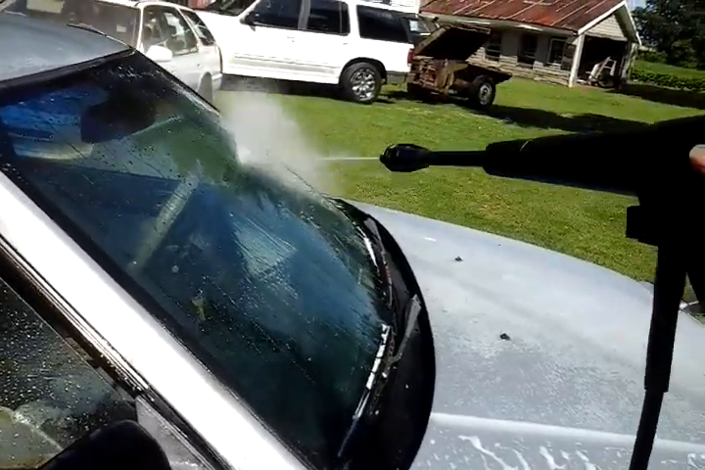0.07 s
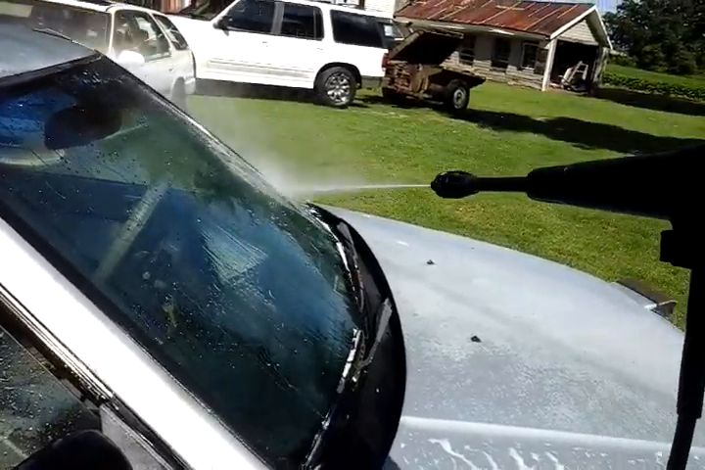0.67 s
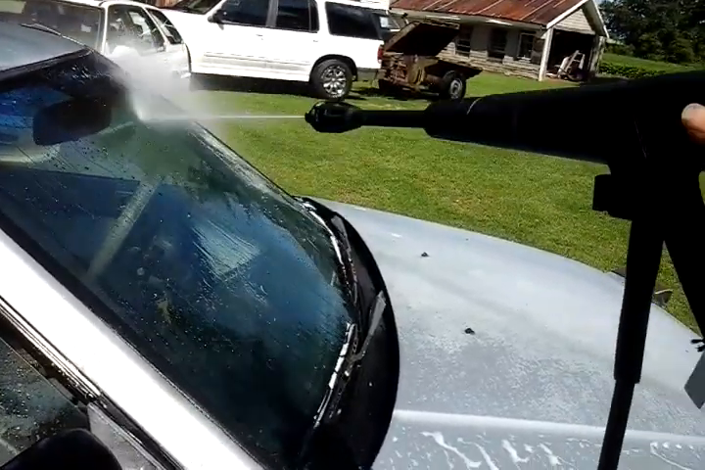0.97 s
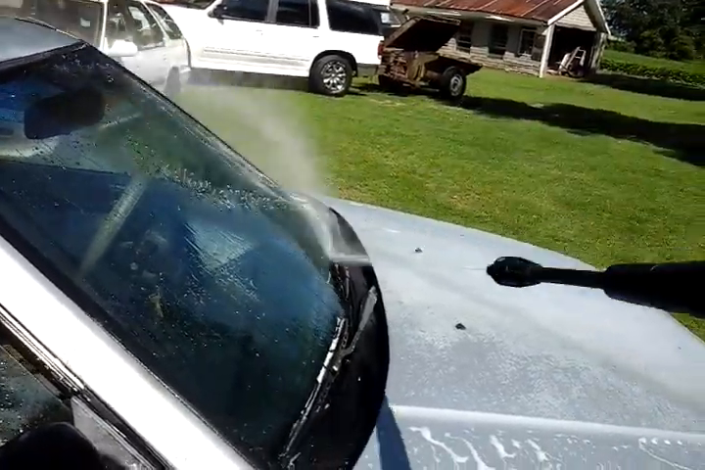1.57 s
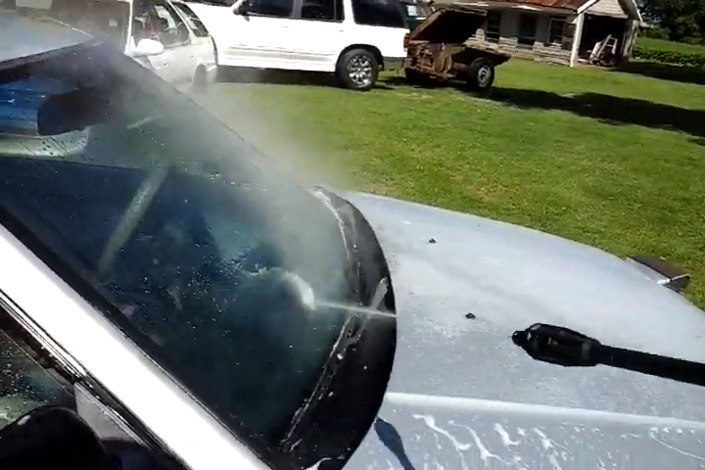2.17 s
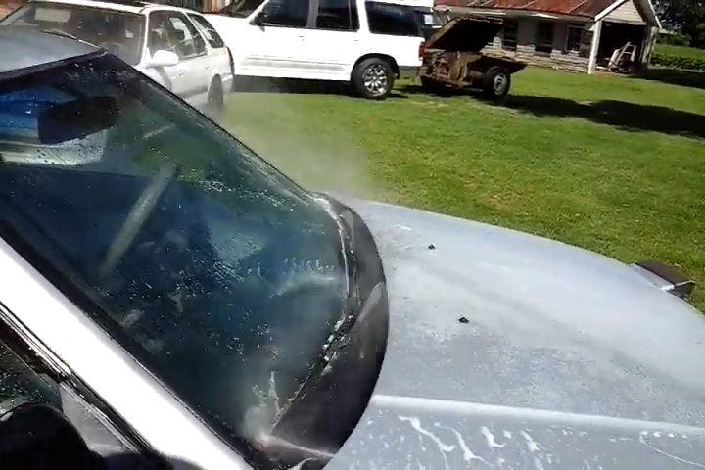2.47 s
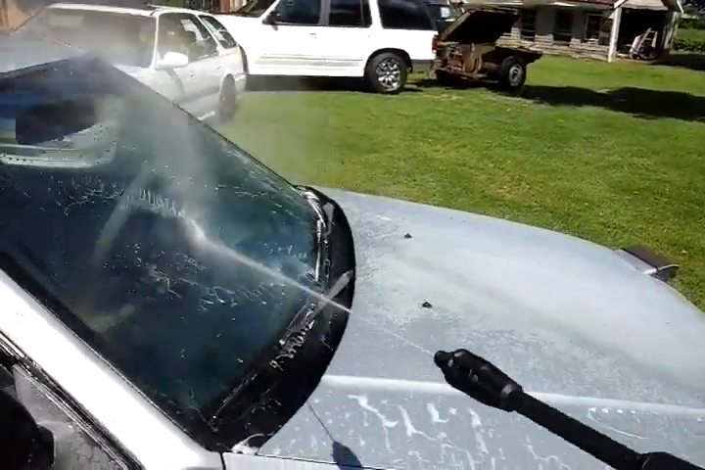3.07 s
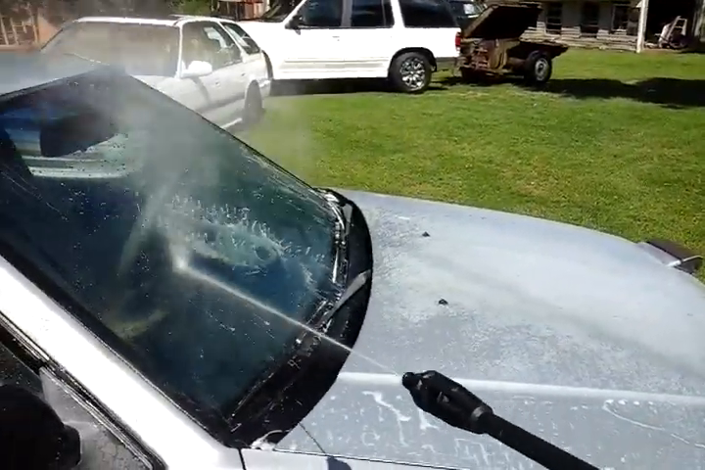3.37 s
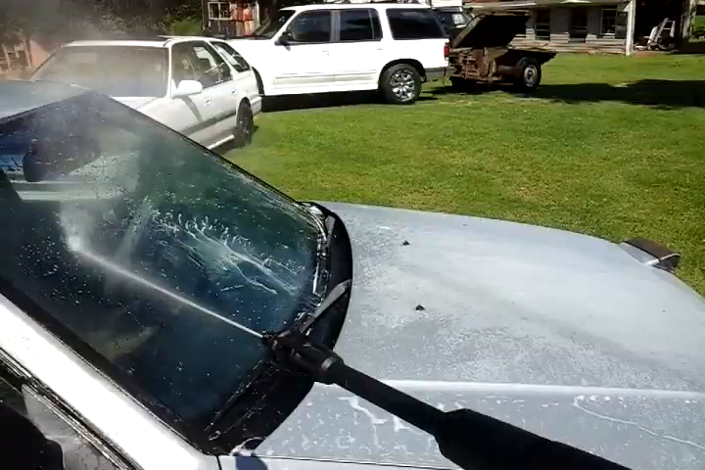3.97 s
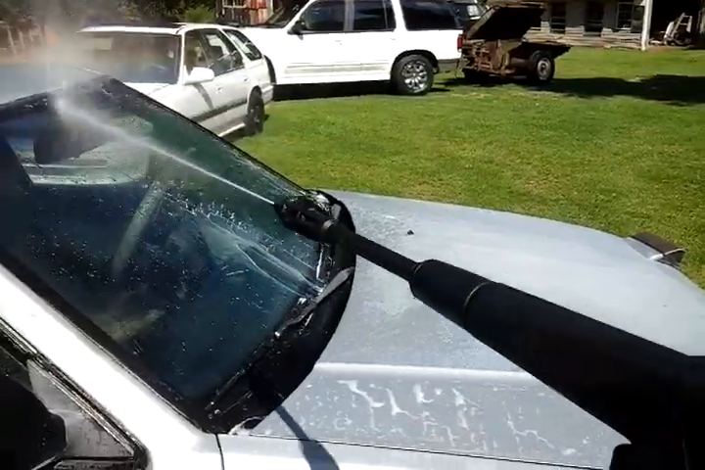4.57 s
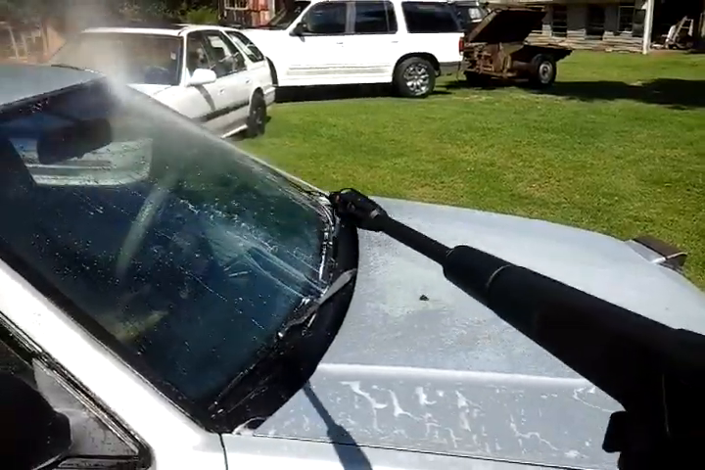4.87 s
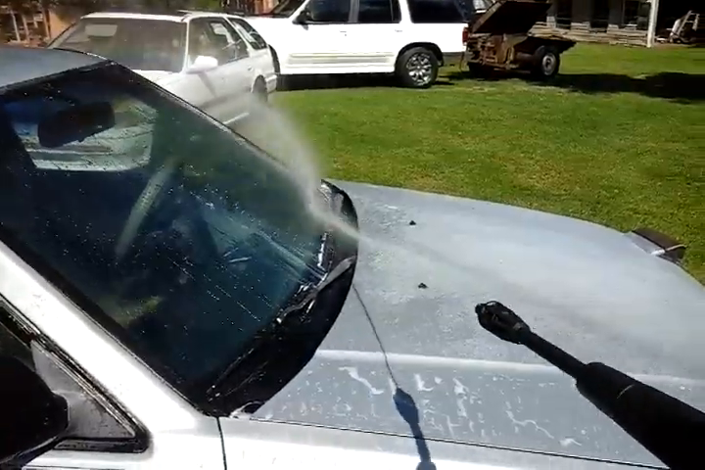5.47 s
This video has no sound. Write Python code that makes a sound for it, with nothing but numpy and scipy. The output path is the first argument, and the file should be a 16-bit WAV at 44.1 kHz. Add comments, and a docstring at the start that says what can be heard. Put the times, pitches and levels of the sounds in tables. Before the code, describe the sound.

An electric pressure washer runs throughout, outdoors, with a steady mid-pitched motor hum, faint whines and a thin high whistle. Over it, a close water jet hisses brightly and splashes on a car windshield, its tone shifting slightly as the aim moves. The spray surges at about 0.5, 1.2 and 1.8 seconds, the hum lifting briefly each time, with a sharp spit of water near 0.7. A fine misty hiss swells around 2.1 seconds. From 2.4 to 2.7 the jet is loudest, splattering and drumming on the plastic trim below the glass with a few quick spits. Smaller surges follow between 2.9 and 4.1 seconds, then the spray settles into a softer, even wash until 5.5. The hiss leans to the right, and light puffs of wind rumble on that side of the microphone, most clearly near 0.3 seconds.

```python
"""On a lawn, an electric pressure washer plays its jet over a car windshield.
The motor hums and drives a geared piston pump, each sounding harmonics of its shaft, with fan noise,
whines and a thin whistle. The nozzle hisses steadily. Drop impacts drum, splash and burst into mist,
swelling where the jet strikes glass and cowl squarely; a close reflection comb-filters them as the
aim shifts. Water spits off edges, and air buffets the right microphone."""
import sys
import numpy as np
from scipy import signal
from scipy.fft import rfft, irfft, next_fast_len
from scipy.io import wavfile
from scipy.ndimage import map_coordinates

SR = 44100
rng = np.random.default_rng(int(sys.argv[2]) if len(sys.argv) > 2 else 0)


def master_out(mix):
    """Clip the mix to full scale and print it as 16-bit PCM to the path in sys.argv[1]."""
    frames = np.transpose(np.atleast_2d(mix))
    ceiling = np.clip(frames, -1, 1)
    pcm = np.round(ceiling * 32767).astype(np.int16)
    wavfile.write(sys.argv[1], SR, pcm)


N = 243331
TIME = np.arange(N) / SR
FFT_SIZE = next_fast_len(N, True)
BINS_HZ = np.maximum(np.fft.rfftfreq(FFT_SIZE, 1 / SR), 1)


def from_db(db):
    """Amplitude grows tenfold for every 20 dB."""
    return 10 ** (np.asarray(db) / 20)


def rms_one(x):
    """Normalisation to unit rms."""
    return x / np.sqrt(np.mean(x ** 2) + 1e-20)


def in_time(rows):
    """Linear interpolation of each column over time."""
    s, *columns = np.transpose(rows)
    return [np.interp(TIME, s, c) for c in columns]


def at_bins(points):
    """Linear interpolation over log frequency."""
    hz, value = np.transpose(points)
    return np.interp(np.log(BINS_HZ), np.log(hz), value)


def swells(rows):
    """Gaussian envelopes, summed; a half length is one standard deviation."""
    return sum(from_db(db) * np.exp(-.5 * ((TIME - s) / half) ** 2) for s, db, half in rows)


def drift(corner_hz):
    """Low-passed noise: a slow random fluctuation of unit rms."""
    step = 20
    pole = np.exp(-2 * np.pi * corner_hz * step / SR)
    slow = signal.lfilter([1], [1, -2 * pole, pole * pole], rng.standard_normal(N // step + 3002))[3000:]
    return np.interp(np.arange(N) / step, np.arange(len(slow)), rms_one(slow))


def drops(per_s, spread_db, smooth):
    """Shot noise: two streams of uneven impacts over a smooth rush."""
    sizes = from_db(spread_db * np.minimum(rng.exponential(1, (2, N)), 4))
    hits = (rng.random((2, N)) < per_s / SR) * sizes * rng.choice([-1, 1], (2, N))
    return rms_one(hits) + smooth * rng.standard_normal((2, N))


# Shading of the left side. Each row: frequency in Hz, left minus right in dB.
LEFT_SHADE = [(60, 0.5), (250, -1.5), (600, -4), (1400, -5), (1750, -3), (2300, -11), (3000, -10),
              (3800, -26.5), (5000, -32), (9000, -31.5), (10500, -25), (12000, -15.5), (14500, -22.5)]
# Likeness of the two sides. Each row: frequency in Hz, correlation coefficient.
CORRELATION = [(30, 0.14), (125, -0.77), (300, -0.72), (600, -0.52), (1200, -0.28), (2200, 0.098),
               (14000, 0.45)]
def coloured(pair, spectrum):
    """Mid-side mixing turns two independent noises into partly coherent stereo; right rms is 1."""
    mid, side = rfft(pair, FFT_SIZE) * from_db(at_bins(spectrum))
    alike = at_bins(CORRELATION)
    mid, side = mid * np.sqrt(1 + alike), side * np.sqrt(1 - alike)
    left = (mid + side) * from_db(at_bins(LEFT_SHADE))
    stereo = irfft(np.array([left, mid - side]), FFT_SIZE)[:, :N]
    return stereo / np.std(stereo[1])


def resonant(centre_hz, width_hz):
    """A noise-driven resonance: a narrow band whose centre may glide, shaded on the left."""
    pole = np.exp(-np.pi * width_hz / SR)
    noise = rng.standard_normal((2, N)) + 1j * rng.standard_normal((2, N))
    envelope = signal.lfilter([1], [1, -2 * pole, pole * pole], noise)
    phase = 2 * np.pi * np.cumsum(centre_hz * np.ones(N)) / SR
    shade_db = np.interp(np.mean(centre_hz), *np.transpose(LEFT_SHADE))
    return rms_one((envelope * np.exp(1j * phase)).real) * from_db([[shade_db], [0]])


# The listener's three stances beside the car. Each entry: time in seconds.
STANCE_TIMES = [0.84, 2.17, 4.58]
def harmonics(angle, table, waver_db, jitter):
    """Rotation sounds multiples of the shaft rate; standing waves set their levels at each stance."""
    total = np.zeros((2, N))
    for multiple, *stance_db, pan_db, lead in table:
        unrest = min(1, round(multiple) / 8)   # the lowest orders are the steadiest
        phase = round(multiple) * angle + unrest * jitter * drift(8.9)
        level_db = np.interp(TIME, STANCE_TIMES, stance_db) + unrest * waver_db * drift(11.0)
        total += from_db([level_db + pan_db, level_db]) * np.sqrt(2) * np.sin([phase + lead, phase])
    return total


def whine(hz, wobble_hz, lead, flutter_db):
    """Random frequency and amplitude modulation make a tone waver."""
    phase = 2 * np.pi * np.cumsum(hz + wobble_hz * drift(14.5)) / SR
    return from_db(flutter_db * drift(22)) * np.sqrt(2) * np.sin([phase + lead, phase])


# Hum as the listener moves. Each row: time in seconds, left and right levels in dB.
HUM_LEVEL = [(0, -27, -24.5), (.35, -28, -25), (1.2, -28.5, -25), (1.75, -31, -25), (2.45, -30, -24.5),
             (2.68, -32.5, -27), (2.85, -31, -26), (4.3, -31.5, -27), (5.5, -31.5, -26.5)]
# Harmonics of the two shafts. Each row: multiple of shaft speed, level at each of the three stances
# in dB re the hum, left minus right in dB, left phase lead in radians.
MOTOR_ORDERS = [(1, 0.5, 0, -0.5, 0.5, 2.5), (2, -28, -19, -30, -2, -2), (11, -28, -21.5, -27, -5, -2)]
PUMP_ORDERS = [(3, -21, -17, -17.5, 3, 3.0), (4, -33, -32, -45, -2, -3.5), (5, -14.5, -16, -23.5, -6, 2.5),
               (6, -15.5, -23.5, -16, -3, -3), (7, -23.5, -28.5, -30.5, 5, -2.5),
               (9, -35, -25, -31.5, 1.5, 1.5), (10, -28, -20.5, -37, -6.5, 3.5),
               (11, -38, -24.5, -24.5, -2, 2.0), (12, -38, -24, -21, 2.5, 3.5),
               (13, -22, -24, -33, -4.5, 3), (15, -24.5, -33, -29, -2, -2.5), (16, -47, -31, -23, 3.5, -2),
               (17, -28, -52, -40, -1, -3.0)]
# Machine whines. Each row: frequency and wobble in Hz, level in dB re the hum,
# left minus right in dB, left phase lead in radians.
WHINE_TONES = [(284.6, 4.12, -22.5, 3.5, 2.88), (1406, 3.87, -22, -7.5, 3), (2730, 7.3, -34, -16, 1.0)]
# Rush of the cooling fan. Each row: frequency in Hz, relative spectral density in dB.
FAN_SPECTRUM = [(20, -40), (60, -17), (120, -7.5), (200, -4), (300, 0), (450, 1.5), (650, -6), (1000, -5),
                (1500, -4), (2200, -9), (4000, -12.5), (9000, -48)]
GEAR_RATIO = 45 / 11   # motor turns per pump turn
def washer(angle):
    """Rotating machinery radiates tones from motor and geared pump, and broadband noise from its fan."""
    hum = from_db(np.array(in_time(HUM_LEVEL)) + hum_lift())
    motor = harmonics(angle, MOTOR_ORDERS, waver_db=5.0, jitter=0.22)
    pump = harmonics(angle / GEAR_RATIO, PUMP_ORDERS, waver_db=2.5, jitter=0.3)
    whines = sum(from_db([[db + pan_db], [db]]) * whine(hz, wobble_hz, lead, flutter_db=4.0)
                 for hz, wobble_hz, db, pan_db, lead in WHINE_TONES)
    fan = from_db(-13.0) * coloured(rng.standard_normal((2, N)), FAN_SPECTRUM)
    return hum * (motor + pump + whines) + hum[1] * fan


# Strength of the whistle. Each row: time in seconds, level in dB.
WHISTLE_CURVE = [(0, -43), (1.42, -41.5), (1.6, -45), (2.05, -39), (2.7, -40), (3.07, -34.5), (3.25, -43.5),
                 (3.5, -48.5), (3.7, -45), (4.07, -39), (4.6, -42), (4.95, -45), (5.5, -44)]
WHISTLE_HZ = 2805
def whistle():
    """A flow tone, probably from the pump valve, roughened by a narrow band of turbulence."""
    level_db, = in_time(WHISTLE_CURVE)
    tone = from_db([[-7], [0]]) * whine(WHISTLE_HZ, wobble_hz=8, lead=1.7, flutter_db=2.5)
    return from_db(level_db) * (tone + from_db(-4) * resonant(WHISTLE_HZ, width_hz=120))


# Nozzle hiss. Each row: frequency in Hz, relative spectral density in dB.
NOZZLE_SPECTRUM = [(500, -44), (2500, -20), (3500, -10), (4200, -7), (4900, -5.5), (5250, -3.5),
                   (5550, -2.5), (6100, -3.5), (6800, -12), (8000, -18.5), (12000, -25.5)]
# Sizzle of the jet in the air. Each row: time in seconds, centre in Hz, level in dB re the hiss.
SIZZLE_BAND = [(0, 5350, -11), (1.2, 5530, -5), (1.7, 5560, -15), (2.5, 4925, -7.5), (2.75, 5840, -10),
               (3.3, 5940, -8), (4.05, 5910, -17), (4.4, 5484, -3), (5.5, 5580, -6)]
def free_jet(nozzle_gain, hiss_gain):
    """Jet noise: a broad hiss at the nozzle and a gliding band of sizzle in the air."""
    centre_hz, sizzle_db = in_time(SIZZLE_BAND)
    nozzle = nozzle_gain * coloured(drops(9000, 2.1, smooth=1.0), NOZZLE_SPECTRUM)
    sizzle = hiss_gain * from_db(sizzle_db) * resonant(centre_hz, width_hz=720)
    return nozzle + sizzle


# The three layers of impact noise. Each row: frequency in Hz, relative spectral density in dB.
SPLASH_SPECTRUM = [(200, -60), (1500, -26), (3300, -16), (4200, -4.5), (4900, 0), (6200, 0.5), (7200, -5),
                   (8500, -8.5), (12000, -22.5)]
DRUM_SPECTRUM = [(60, -38), (300, -23), (700, -5.5), (1400, -5.5), (2000, -0.5), (2700, 1), (3500, -0.5),
                 (5000, -11), (9000, -43)]
MIST_SPECTRUM = [(400, -62), (4000, -20), (7000, 1.5), (8500, 2.5), (10000, 3), (11000, 1.5), (12500, 1.5),
                 (14400, 0.5)]
def spray(drum_gain, splash_gain, mist_gain):
    """Dense impacts merge into noise as drops splash, drum on the panels and burst into mist."""
    splash = splash_gain * coloured(drops(5000, 3.5, smooth=0.52), SPLASH_SPECTRUM)
    drumming = drum_gain * coloured(drops(4000, 2.3, smooth=0.86), DRUM_SPECTRUM)
    mist = mist_gain * coloured(drops(7000, 3.9, smooth=0.89), MIST_SPECTRUM)
    return splash + drumming + mist


def delayed(x, delay_s):
    """A changing path length gives a changing delay."""
    return np.array([map_coordinates(side, [np.arange(N) - delay_s * SR], order=3) for side in x])


# Echo beside the point of impact. Each row: time in seconds, comb spacing in Hz, relative echo gain.
GLASS_ECHO = [(0, 1690, .33), (.8, 1630, 0.4), (1.5, 1790, .15), (1.9, 2000, .15), (2.16, 2390, 0.46),
              (2.3, 2120, .15), (2.52, 2366, 0.38), (2.66, 2420, 0.7), (2.77, 1960, 0.4),
              (2.95, 2100, 0.26), (3.2, 1920, 0.34), (3.65, 2060, 0.23), (4.05, 2060, 0.33),
              (4.4, 1860, 0.3), (5.5, 1897, 0.3)]
def reflected(x):
    """Comb filtering: the sound interferes with an echo that follows the aim and one that wanders."""
    spacing_hz, glass_gain = in_time(GLASS_ECHO)
    panel_gain, panel_delay_s = .17, 0.001109
    glass = glass_gain * delayed(x, 1 / spacing_hz)
    panels = panel_gain * delayed(x, panel_delay_s * (1 + 0.081 * drift(2.2)))
    return (x + glass + panels) / np.sqrt(1 + glass_gain ** 2 + panel_gain ** 2)


# Steady wash over the glass. Each row: time in seconds, relative drumming, splash and mist in dB.
STEADY_WASH = [(0, -45.5, -31.5, -45), (.35, -52.5, -34.5, -42), (1.05, -49, -34, -44.5),
               (1.6, -43, -31.5, -40.5), (2.7, -41.5, -29.5, -38), (3.6, -42.5, -31.5, -38),
               (3.9, -44.5, -32, -44), (4.2, -44, -32, -42.5), (4.6, -46, -34, -49), (5.5, -45, -34.5, -46)]
LAYER_GAINS_DB = [[6.5], [5.0], [7.5]]   # drumming, splash, mist
def jet(angle):
    """Incoherent sources add in power; three pistons and a random flutter modulate all the water."""
    power = from_db(in_time(STEADY_WASH)) ** 2 + surge_power() + cowl_power()
    power[2] += cloud_power()
    drum_gain, hiss_gain, mist_gain = np.sqrt(power) * from_db(LAYER_GAINS_DB)
    nozzle_gain = np.minimum(from_db(-31), 0.87 * hiss_gain)   # the nozzle's steady share of the hiss
    splash_gain = np.sqrt(hiss_gain ** 2 - nozzle_gain ** 2)
    airborne = free_jet(nozzle_gain, hiss_gain)
    impacts = spray(drum_gain, splash_gain, mist_gain)
    knocks = cowl_ring()
    strokes = np.sin(3 * angle / GEAR_RATIO)
    pressure = from_db(0.22 * strokes + 0.62 * drift(63))
    return pressure * (airborne + knocks + spits() + reflected(impacts))


# Puffs of air. Each row: peak time in seconds, level in dB, half length in seconds.
AIR_PUFFS = [(.24, -46, .03), (.303, -32.5, 0.013), (.355, -39, 0.017), (.63, -45.5, 0.037),
             (1.05, -50, 0.042), (2.43, -46, .015), (2.73, -43, 0.027), (2.83, -40, 0.033),
             (3.25, -42, 0.013), (3.68, -45, 0.025), (3.89, -49, .035), (4.39, -43, .022)]
# Their rumble. Each row: frequency in Hz, relative spectral density in dB.
WIND_SPECTRUM = [(20, -11), (50, -4), (110, 0), (200, -1), (350, -6), (900, -43)]
def wind():
    """Turbulent pressure buffets the microphones, the right far more than the left."""
    rumble = coloured(rng.standard_normal((2, N)), WIND_SPECTRUM)
    return swells(AIR_PUFFS) * rumble * from_db([[-15], [0]])


def since(s):
    """Seconds elapsed since a moment, zero before it."""
    return np.maximum(TIME - s, 0)


def onset(s):
    """The linear attack of a surge, 0 to 1."""
    return np.minimum(since(s) / ATTACK_S, 1)


# The jet bites on the car. Each row: start and hold in seconds, relative drumming, splash and mist
# in dB, hum lift in dB.
JET_SURGES = [(0.517, 0.2, -48, -28.5, -40.5, 5), (1.24, 0.15, -45, -29.5, -37, 4.5),
              (1.77, 0.41, -39, -29, -36.5, 4), (2.715, 0.11, -47, -34.5, -45, 2),
              (2.861, .22, -46, -31, -36.5, 2), (3.221, 0.21, -41, -28, -40, 3.5),
              (3.549, .13, -42, -30.5, -40.5, 2), (3.971, .08, -42.5, -29, -38.5, 4),
              (4.67, .04, -48, -37.5, -60, .3)]
ATTACK_S, OVERSHOOT, SETTLE_S, RELEASE_S, HUM_SETTLE_S = 0.032, 0.82, 0.044, 0.12, 0.25
def surge_power():
    """Each surge is a transient that overshoots, settles and decays exponentially."""
    power = np.zeros((3, N))
    for s, hold_s, *layer_db, _ in JET_SURGES:
        settling = 1 + OVERSHOOT * np.exp(-since(s) / SETTLE_S)
        release = np.exp(-since(s + hold_s) / RELEASE_S)
        power += np.outer(from_db(layer_db), onset(s) * settling * release) ** 2
    return power


def hum_lift():
    """The hum's level in dB jumps with each surge and relaxes exponentially."""
    return sum(lift_db * onset(s) * np.exp(-since(s + ATTACK_S) / HUM_SETTLE_S)
               for s, *_, lift_db in JET_SURGES)


# The jet catches an edge. Each row: start in seconds, level in dB, decay time in seconds.
EDGE_SPITS = [(.551, -19, .003), (.698, -5.5, .002), (2.471, -17, .002), (2.619, -11, .003),
              (2.651, -7, .0012), (2.792, -17, .0015)]
def spits():
    """Water torn off an edge makes impulsive noise with an exponential decay."""
    bursts = sum(from_db(db) * (TIME >= s) * np.exp(-since(s) / decay) for s, db, decay in EDGE_SPITS)
    return bursts * coloured(rng.standard_normal((2, N)), SPLASH_SPECTRUM)


# Clouds of mist. Each row: peak time in seconds, relative level in dB, half length in seconds.
MIST_CLOUDS = [(1.36, -32.5, 0.11), (2.08, -26.5, 0.15), (2.7, -31.5, 0.04), (2.91, -30.5, .025),
               (4.01, -31.5, 0.022)]
def cloud_power():
    """Atomisation: the jet meets the glass squarely and the power of the mist swells."""
    return swells(MIST_CLOUDS) ** 2


# The jet crosses the cowl or trim. Each row: peak time and half length in seconds,
# relative knock, splash and mist in dB.
COWL_STRIKES = [(2.364, .007, -42, -26, -31), (2.395, 0.012, -30.5, -26.5, -38),
                (2.443, 0.016, -31, -24.5, -34), (2.469, 0.0094, -28, -21.5, -35),
                (2.54, 0.033, -36.5, -21.5, -23.5), (2.617, 0.025, -40, -23.5, -25.5),
                (3.748, 0.011, -37, -27.5, -51)]
def cowl_ring():
    """Forced resonance: the plastic rings in one broad band while the jet drives it."""
    knocks = swells([(s, knock_db, half) for s, half, knock_db, *_ in COWL_STRIKES])
    return knocks * resonant(centre_hz=2307, width_hz=730)


def cowl_power():
    """Each impact on the cowl adds power to the splash, the mist and the drumming of the panel behind."""
    return sum(np.outer(from_db([knock_db - 1, splash_db, mist_db]), swells([(s, 0, half)])) ** 2
               for s, half, knock_db, splash_db, mist_db in COWL_STRIKES)


# Speed of the motor. Each row: time in seconds, turns per second.
MOTOR_SPEED = [(0, 377.2), (1.1, 377.4), (1.6, 378.1), (2.2, 378.6), (2.9, 378.7), (3.5, 378.3),
               (3.9, 377.6), (4.5, 378.0), (5.5, 377.8)]
def scene():
    """Superposition of machine, jet and breeze; one shaft angle drives both hum and piston strokes."""
    turns_per_s, = in_time(MOTOR_SPEED)
    angle = 2 * np.pi * np.cumsum(turns_per_s) / SR
    return washer(angle) + whistle() + jet(angle) + wind()


def record(dry):
    """Soft saturation rounds the highest peaks; a steep low-pass filter limits the bandwidth."""
    ceiling, cutoff_hz = .95, 14520
    rounded = dry / (1 + (dry / ceiling) ** 6) ** (1 / 6)
    return signal.sosfilt(signal.ellip(16, .1, 90, cutoff_hz, fs=SR, output="sos"), rounded)


dry = scene()
out = record(dry)
master_out(out)
```